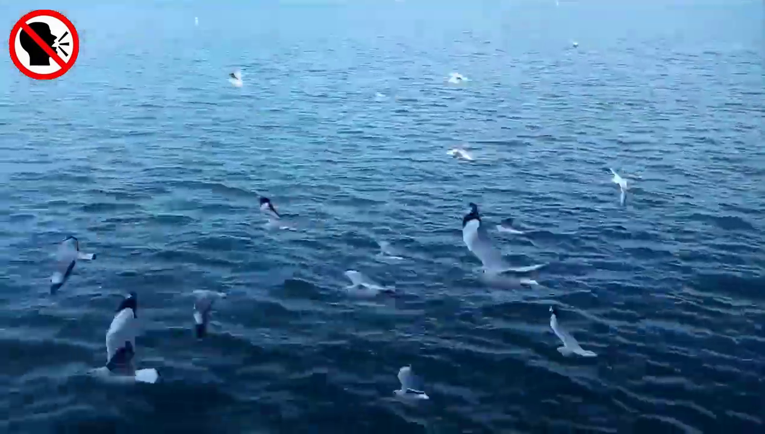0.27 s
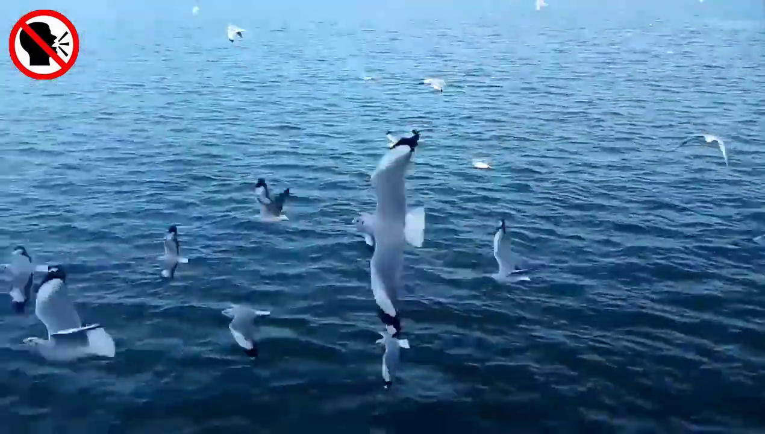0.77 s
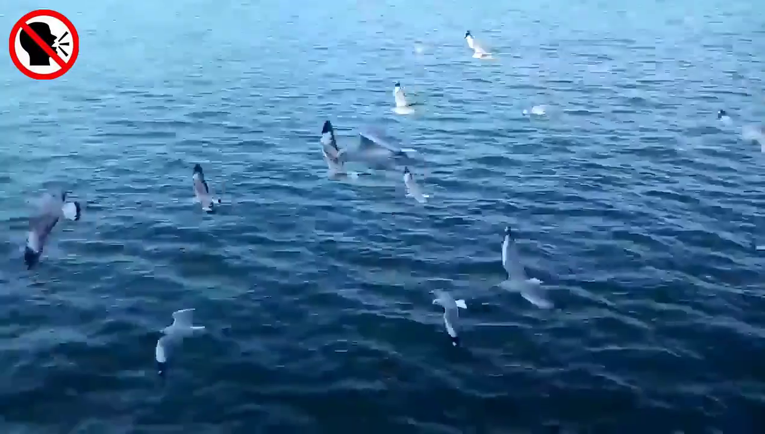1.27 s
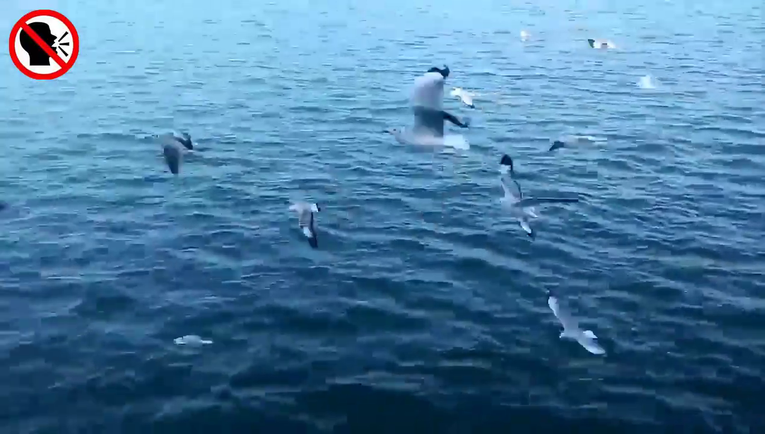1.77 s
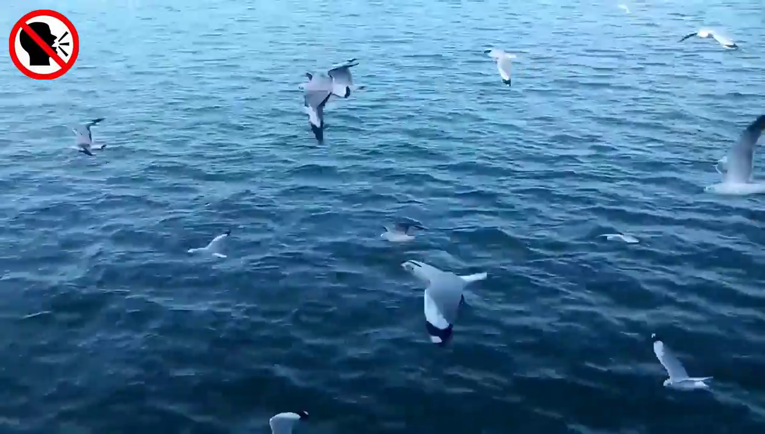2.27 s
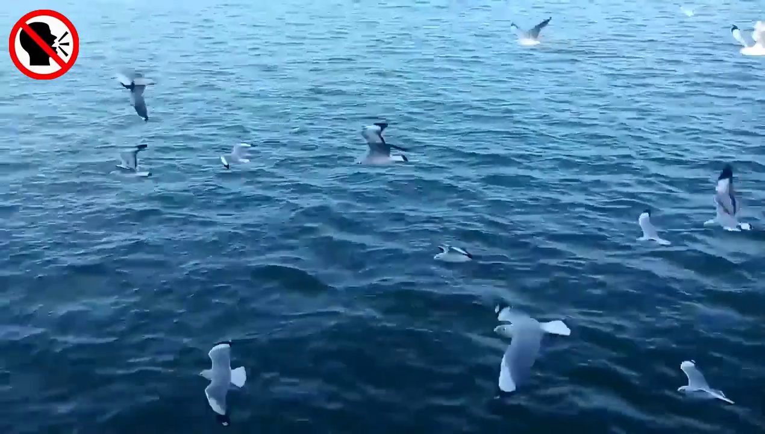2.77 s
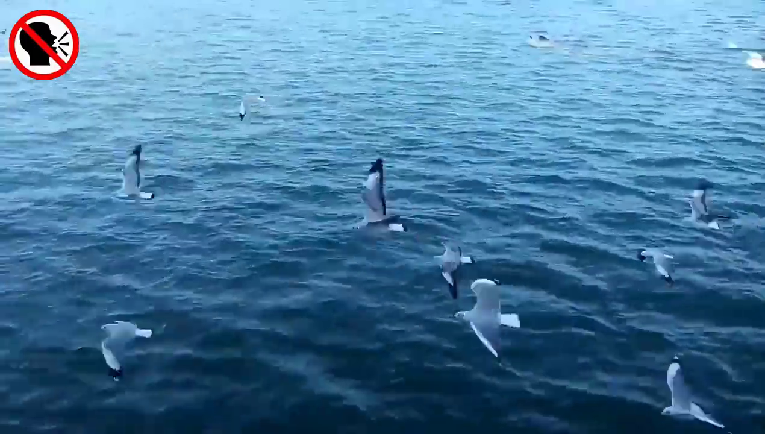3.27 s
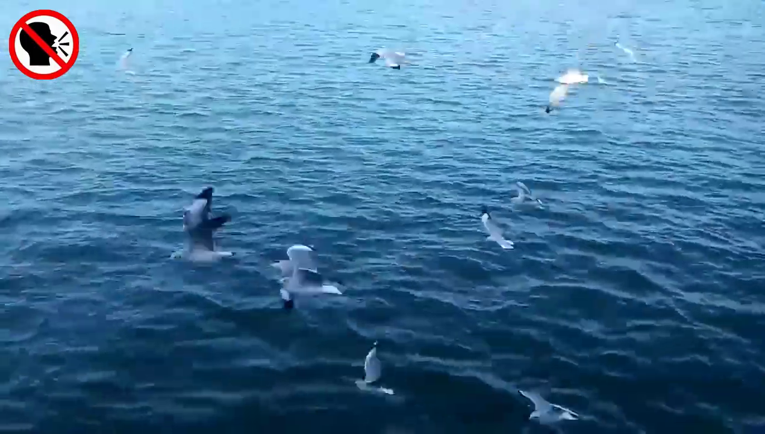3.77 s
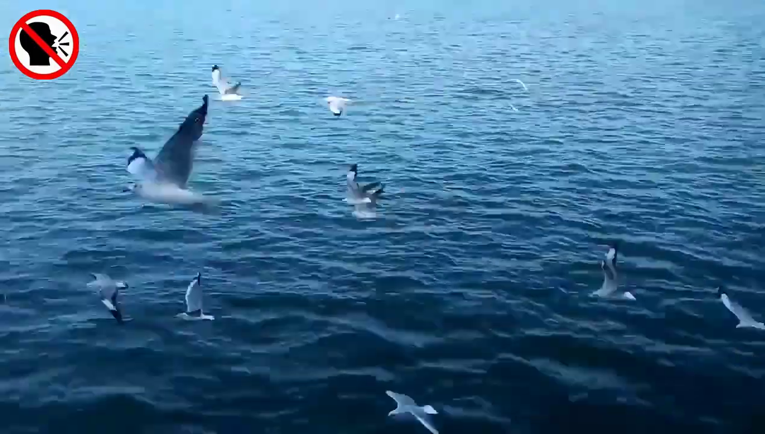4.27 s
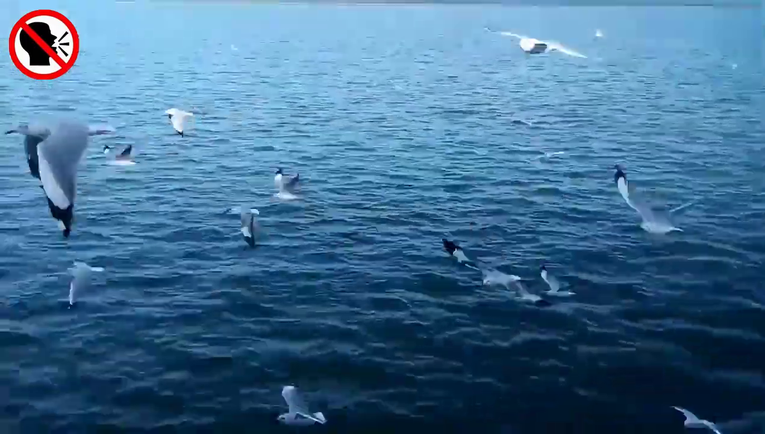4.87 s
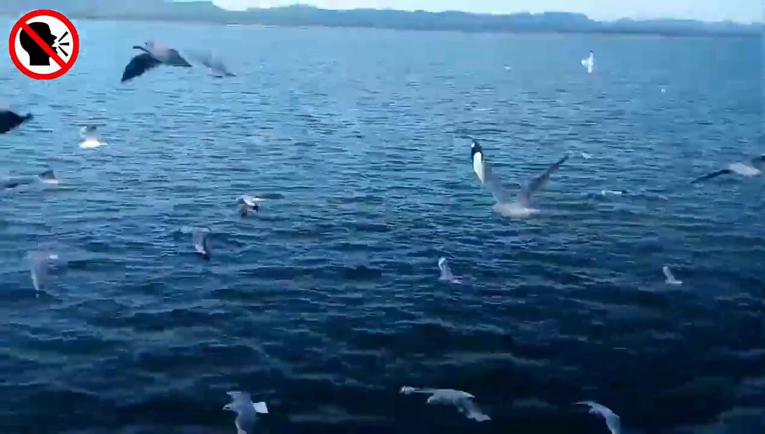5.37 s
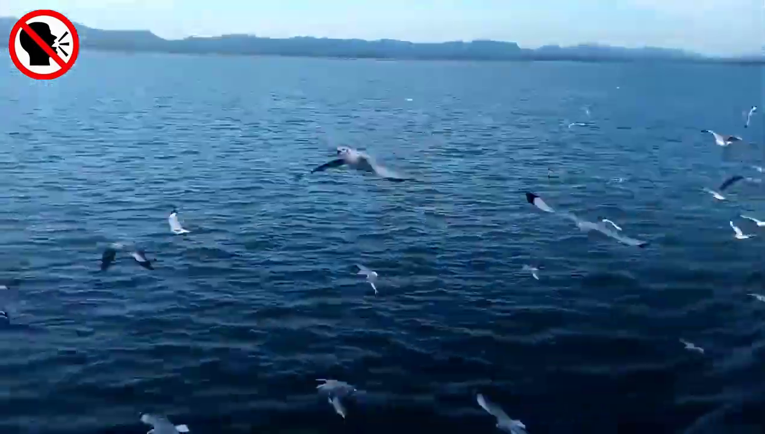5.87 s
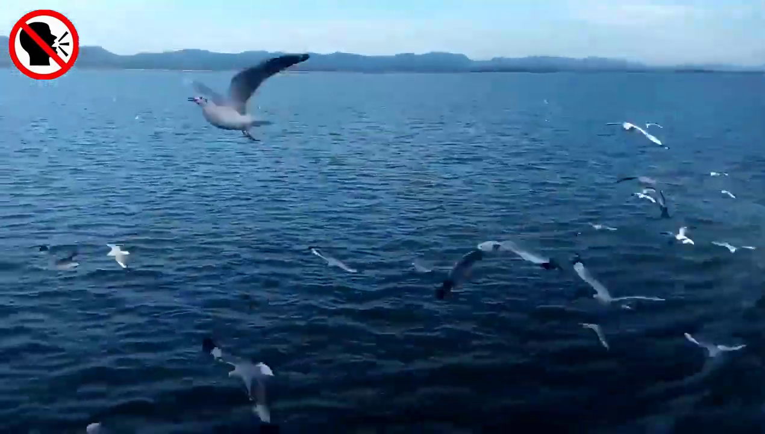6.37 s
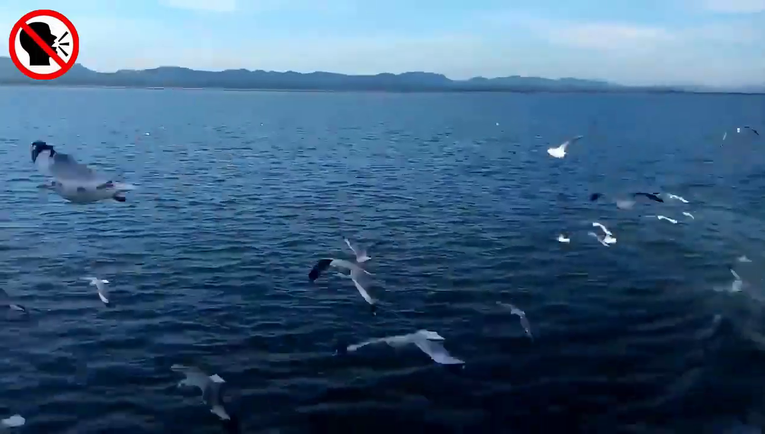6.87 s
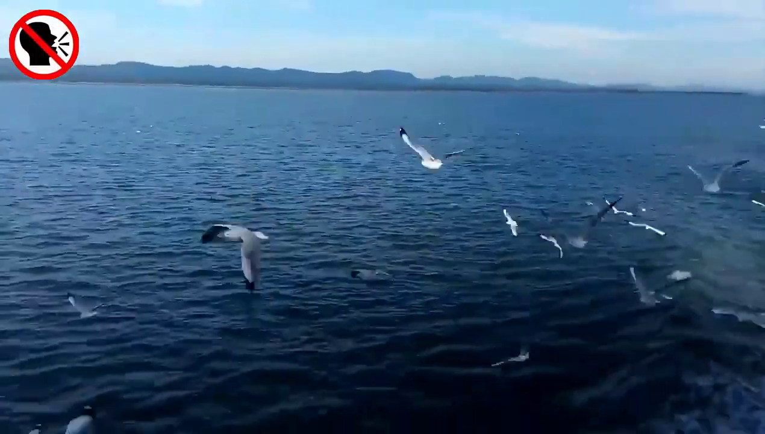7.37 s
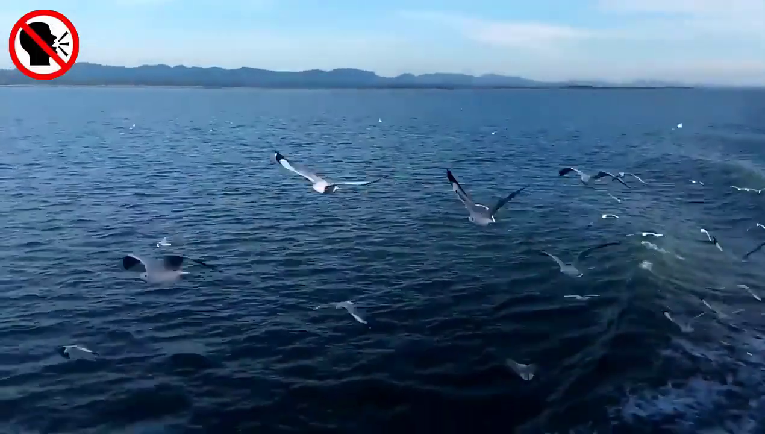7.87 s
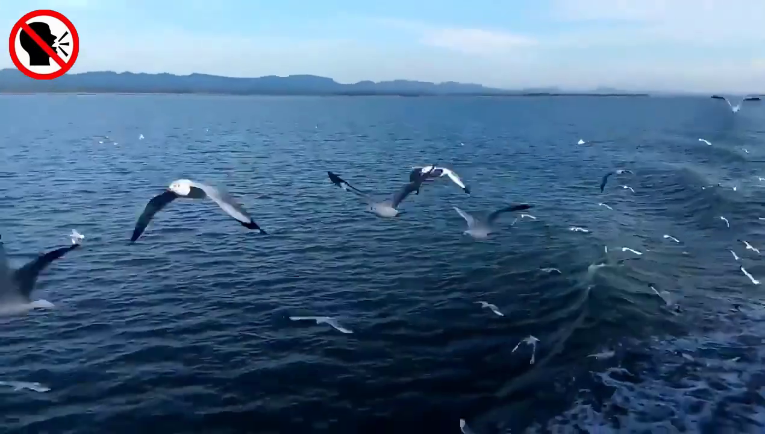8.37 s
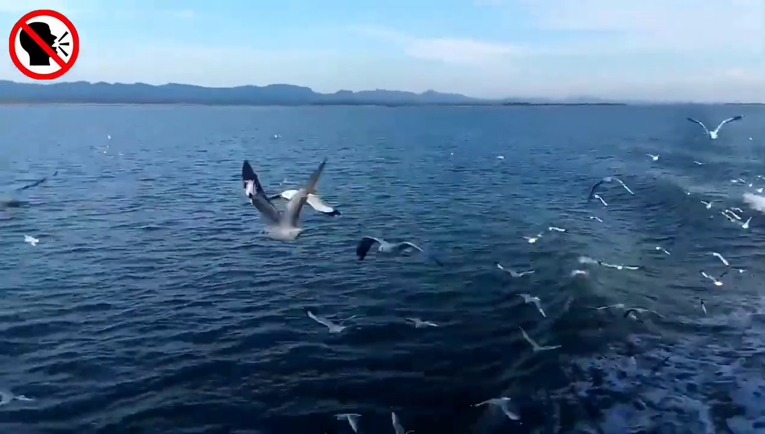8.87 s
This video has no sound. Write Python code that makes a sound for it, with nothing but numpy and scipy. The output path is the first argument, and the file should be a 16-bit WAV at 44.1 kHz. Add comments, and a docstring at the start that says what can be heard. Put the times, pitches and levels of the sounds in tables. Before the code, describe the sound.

A flock of gulls follows a boat on open water. Piercing, rough-edged screams come in two loud clusters, early and late; between them are low nasal yaps, thin high whistles from young birds and a few hoarse rasps, with faint distant yapping. Constant bubbling wash runs beneath. Most calls lean to the right, some central or left; a close stereo pair slightly overloads.

```python
"""Behind a boat at sea, a flock of gulls screams, wails and yaps over the rush of the bow wave.
The voices are stacks of overtones, made rough by shaken pitch and hiss; thin whistles, mostly from
young birds, and hoarse rasps join in. The water is shaped noise with ringing bubbles. Hull, deck and
waves throw the calls back, and the nearest birds overload the two close-set microphones."""
import sys
import numpy as np
from scipy import signal
from scipy.fft import rfft, irfft
from scipy.io import wavfile
from scipy.ndimage import uniform_filter1d

SR = 44100
rng = np.random.default_rng(int(sys.argv[2]) if len(sys.argv) > 2 else 0)


def transcribe(signal):
    """Save signal, clipped to [-1, 1], as a 16-bit WAV file at the path in sys.argv[1]."""
    frames = np.atleast_2d(signal).T
    limited = np.clip(frames, -1, 1)
    pcm = np.round(limited * 32767).astype(np.int16)
    wavfile.write(sys.argv[1], SR, pcm)


N = 402191  # length in samples


def amp(db):
    """Turns decibels into a gain."""
    return 10 ** (np.asarray(db) / 20)


def evened(x):
    """Scales to an average strength (rms) of one."""
    return x / np.sqrt(np.mean(x ** 2) + 1e-20)


def read(points, hz):
    """Reads a table between its points, on a log-frequency axis."""
    f, value = np.transpose(points)
    return np.interp(np.log(hz + 1), np.log(f + 1), value)


def coloured(x, points):
    """Filters a sound by a table of gains over frequency."""
    gain = amp(read(points, np.fft.rfftfreq(x.shape[-1], 1 / SR)))
    return irfft(rfft(x) * gain, x.shape[-1])


def wander(count, hz):
    """Smooth random motion of unit size, with little movement faster than hz times a second."""
    f = np.fft.rfftfreq(SR, 1 / SR)
    slow = rfft(rng.standard_normal(SR)) / (1 + (f / hz) ** 4)
    return evened(irfft(slow, SR))[:count]


def add(mix, s, sound, side_db, lag_ms):
    """Places a sound on the microphone pair by a level difference and a lag of the left microphone."""
    gains = evened(amp(np.array([side_db, -side_db]) / 2))
    for channel, gain, delay in zip(mix, gains, (lag_ms / 1000, 0)):
        first = max(round(s * SR) + round(delay * SR), 0)
        part = channel[first:][:len(sound)]
        part += gain * sound[:len(part)]


def screams(bright_db=2.5, scoop=.09, droop_oct_per_s=3.8):
    """Cries and screams with strong overtones, mostly from near birds, one a faint wail."""
    # Each row is a syllable: time of full voice in seconds, attack, hold and release in seconds,
    # pitch in Hz, sag in Hz per second, level in dB, roughness 0-1, half-lines between the harmonics
    # in dB, left-right difference in dB, lag of the left microphone in ms.
    syllables = [(1.169, .026, .122, 0.037, 3192, 860, 1.5, 0.08, -27, -7, 0.12),
                 (1.352, 0.043, 0.011, 0.02, 2832, 6130, -4, 0.89, -3, -11.5, 0.23),
                 (1.371, .008, 0.0087, 0.024, 2596, 7950, -10.5, 0.08, -20, -4, .13),
                 (1.959, 0.043, 0.017, 0.031, 2750, 3660, 0, 0.23, -4, 2.5, .01),
                 (2.008, 0.019, 0.1, 0.017, 2764, 100, -14, 0.52, 2, -2, .01),
                 (2.079, .035, 0.019, 0.047, 2868, 2530, -5, 0, -3.5, 5, .01),
                 (2.129, .02, 0.014, 0.089, 2790, 6950, -15, 0.27, 1, 0, .01),
                 (4.898, .04, .008, 0.032, 2610, 3100, -10, .3, 2.5, -10.5, .13),
                 (5.03, 0.054, 0.011, 0.067, 2716, 200, -14, 0.18, 5, -14, 0.11),
                 (6.47, .035, 0.059, 0.044, 2314, 690, -22, 0.08, 23, -14, .22),
                 (7.026, .04, 0.0128, 0.052, 2370, 2480, -14.5, 0.88, 1, -9, 0.26),
                 (8.412, 0.09, .07, 0.08, 3776, 297, -4, 0.57, -5.5, -13.5, 0.23),
                 (8.475, 0.042, 0.023, 0.058, 2674, 7510, -1, 0.46, -1, -2, 0.12),
                 (8.605, 0.038, 0.022, 0.016, 2736, 9130, 0.5, 0.38, -3.5, -6.5, .13),
                 (8.646, 0.016, 0.015, 0.082, 3070, 10000, -20.5, 0.47, -12, -1.3, 0.094)]
    out = np.zeros((2, N))
    for s, attack, hold, release, hz, sag, db, rough, half_db, side_db, lag_ms in syllables:
        voice = cry(attack, hold, release, hz, sag, db, rough, half_db, bright_db,
                    scoop, droop_oct_per_s)
        add(out, s - attack, voice, side_db, lag_ms)
    return out


def wails(hiss_db=-12, attack=.065, release=.23, scoop=.31, droop_oct_per_s=3.5):
    """Lower, duller cries that swell and die away slowly; the rougher the voice, the more it hisses."""
    # Each row: time of full voice in seconds, hold in seconds, pitch in Hz, sag in Hz per second,
    # level in dB, roughness 0-1, half-lines in dB, overtone strength in dB, left-right difference in dB,
    # lag of the left microphone in ms.
    wail_rows = [(.95, 0.2, 2378, 653, -18.5, 0.11, 12.5, -30, -7, .18),
                 (4.292, 0.088, 1944, 1870, -21.5, 0.34, -10, -17.5, 0, 0.049),
                 (8.9, .14, 2035, 1735, -13.5, 0.48, -3, -19, 6, -0.038)]
    # Air rasping in the bill. Each row: frequency in Hz, relative level in dB.
    bill_hiss = [(3000, -45), (5000, -18), (5800, -6), (6400, -7), (7200, -47)]
    out = np.zeros((2, N))
    for s, hold, hz, sag, db, rough, half_db, bright_db, side_db, lag_ms in wail_rows:
        voice = cry(attack, hold, release, hz, sag, db, rough, half_db, bright_db,
                    scoop, droop_oct_per_s)
        hiss = evened(coloured(rng.standard_normal(SR), bill_hiss))[:len(voice)]
        loudness = uniform_filter1d(abs(voice), size=200)
        add(out, s - attack, voice + hiss * amp(hiss_db) * rough * loudness, side_db, lag_ms)
    return out


def cry(attack, hold, release, hz, sag, db, rough, half_db, bright_db, scoop, droop_oct_per_s,
        fade_db=25, slack_rough=.3, waver=.0065, waver_hz=28):
    """Effort rises, holds and lets go: pitch scoops up, sags, wavers, then droops; slack is soft and rough."""
    t = np.arange(-attack, hold + release, 1 / SR)  # zero at full voice
    early = np.maximum(-t, 0) / attack
    late = np.maximum(t - hold, 0)
    slack = early + late / release
    # scoop and waver are shares of the pitch
    bend = 1 - scoop * early ** 2 + waver * wander(len(t), waver_hz)
    pitch = (hz - sag * t) * bend * 2 ** (-droop_oct_per_s * late)
    voice = syrinx(pitch, rough + slack_rough * slack, half_db, bright_db)
    return voice * amp(db - fade_db * slack ** 1.05) * signal.windows.tukey(len(t), .05)


def syrinx(hz, rough, half_db, bright_db, hiss_db=-3, jitter_hz=115, smear=0.72, quarter_lines=.33):
    """A bird's voice organ: harmonics and period-doubled half-lines; roughness shakes pitch and adds hiss."""
    # What throat and open bill let through. Each row: frequency in Hz, relative level in dB.
    throat = [(300, -54), (800, -24.5), (1400, -5), (1900, -8.5), (2600, -3), (3400, 1), (4200, -2),
              (5000, -10), (5800, -8), (7400, -33), (10000, -24.5), (15000, -35)]
    count, rough = len(hz), np.clip(rough, 0, 1)
    shake = jitter_hz * rough * (wander(count, 445) + 0.638 * wander(count, 102.6))
    turns = np.cumsum(hz + shake) / SR
    # uneven cycles spread the main line into a noisy band
    tone = np.cos(2 * np.pi * turns) + smear * rough * wander(count, 450) * np.sin(2 * np.pi * turns)
    for k in (1, 3, 4, 5, 6, 7, 8):  # multiples of half the pitch; odd ones are half-lines
        db = read(throat, hz * k / 2) + half_db * (k % 2) + bright_db * (k > 2)
        tone = tone + amp(db) * (hz * k < SR) * np.cos(np.pi * k * turns)
    # the period doubles once more
    quarter = quarter_lines * amp(np.minimum(half_db, 0))
    tone = tone * (1 + quarter * np.cos(np.pi * turns / 2))
    hiss = evened(coloured(rng.standard_normal(SR), throat))[:count]
    hiss = hiss * (1 + .5 * np.cos(np.pi * turns))  # puffs at half the pitch
    voice = (tone + amp(hiss_db + bright_db) * rough * hiss) * rattle(count, rough)
    # even out the loudness over about 20 ms
    return voice / np.sqrt(uniform_filter1d(voice ** 2, size=900) + 1e-9)


def rattle(count, rough, rate_hz=105, depth=0.46, uneven=0.34):
    """A strained syrinx beats irregularly, chopping the voice."""
    rate = rate_hz * (1 + uneven * wander(count, 76))
    beat = np.sin(2 * np.pi * np.cumsum(rate) / SR)
    return np.exp(rough * depth * (beat + .5 * wander(count, 220)))


def yaps(arch=0.3, half_db=2, edge_db=21, level_db=-1, top_hz=5000, end_rough=.6, rough_per_db=.05):
    """Short yaps on one arch of pitch, rougher when soft and at their ends; the half-shut bill dulls them."""
    # Each row: middle in seconds, nominal length in seconds, top pitch in Hz, relative level in dB,
    # overtone strength in dB, left-right difference in dB, lag of the left microphone in ms.
    yap_rows = [(1.419, 0.052, 1844, -16, -9, -10, 0.27), (1.529, 0.07, 1748, -6, -14.5, 2, 0.025),
                (1.76, 0.11, 1802, -19.5, -6.5, -8, 0.15), (2.198, 0.043, 1933, -11, -12, 2, 0),
                (2.304, 0.11, 1773, -18, -3, -10.5, 0.22), (2.524, 0.099, 1730, -16.5, -9, -14, 0.27),
                (2.633, 0.064, 1747, -9.5, -16, 1, 0.058), (2.806, 0.065, 1690, -16, -14.5, -8, .28),
                (3.07, 0.04, 1612, -14, -29, -11, .16), (3.109, 0.068, 1630, -14.5, -20.5, -13, 0.22),
                (3.169, 0.064, 1535, -11.5, -14, 0, .09), (3.194, 0.055, 1688, -9.5, -16.5, -1, 0.057),
                (3.735, 0.063, 1729, -10.5, -12, -2, 0.14), (4.022, 0.044, 1690, -15.5, -14, 2, 0.11),
                (4.308, 0.06, 1733, -11.5, -14, -4.5, 0.17), (5.517, 0.052, 1648, -16, -14, -8, 0.19),
                (6.212, 0.053, 1763, -10, -16, -9, 0.21), (6.935, 0.069, 1746, -11.5, -12, -9, 0.2),
                (7.061, 0.1, 1600, -12.5, -17, -9, 0.24), (7.288, 0.079, 1747, -9.5, -14.5, -10, 0.21),
                (7.662, 0.12, 1688, -14.5, -11.5, -10, 0.4), (8.163, 0.07, 1733, -11.5, -18, -11.5, 0.26)]
    out = np.zeros((2, N))
    for s, length, hz, db, bright_db, side_db, lag_ms in yap_rows:
        u = np.linspace(-1, 1, int(length * SR * 1.2))  # room for the faint ends
        rough = end_rough * u ** 2 - rough_per_db * db
        voice = syrinx(hz * (1 - arch * u ** 2), rough, half_db, bright_db)
        swell = amp(db + level_db - edge_db * abs(u) ** 1.96) * signal.windows.tukey(len(u), .15)
        add(out, s - len(u) / SR / 2, voice * swell, side_db, lag_ms)
    return signal.lfilter(*signal.butter(1, top_hz, fs=SR), out)


def whistles(top=.42, sag=0.38, overtone_db=-38, side_db=-13.5, lag_ms=0.24):
    """Nearly pure whistled notes, mostly young birds', one a second strand within the long scream."""
    # Each note rises a little and droops at the end.
    # Each row: start in seconds, end in seconds, top pitch in Hz, level in dB.
    whistle_rows = [(0.326, 0.476, 3320, -23.5), (1.18, 1.29, 3504, -19.5), (2.314, 2.403, 3700, -27.5),
                    (3.108, 3.294, 3445, -18.5), (4.061, 4.27, 3596, -18), (4.449, 4.64, 3650, -18.5),
                    (4.503, 4.539, 4320, -20.5), (4.507, 4.653, 4820, -41), (4.62, 4.806, 3630, -17.5),
                    (5.362, 5.514, 3613, -23)]
    out = np.zeros((2, N))
    for start, end, hz, db in whistle_rows:
        u = np.linspace(0, 1, int((end - start) * SR))
        pitch = hz * (1 - sag * (u - top) ** 2 + 0.0015 * wander(len(u), 80))
        turns = np.cumsum(pitch) / SR
        tone = np.sin(2 * np.pi * turns) + amp(overtone_db) * np.sin(4 * np.pi * turns)
        swell = abs(np.sin(np.pi * u)) ** 1.37 * amp(db + 2.4 * wander(len(u), 37))
        add(out, start, np.sqrt(2) * tone * swell, side_db, lag_ms)
    return out


def rasps(tone_share=1.0, jitter=0.043, side_db=-14, lag_ms=0.22):
    """Young birds' hoarse calls: a shaken whistle mixed with rattling turbulence."""
    # Each row: start in seconds, end in seconds, pitch in Hz, level in dB.
    rasp_rows = [(5.534, 5.731, 4280, -26), (6.368, 6.466, 4230, -23.5), (7.437, 7.644, 4430, -21.5)]
    # Colour of the turbulence. Each row: frequency in Hz, relative level in dB.
    rasp_colour = [(1500, -41), (2800, -8), (3500, -1.5), (4500, -0.5), (5400, -15.5), (6500, -15.5),
                   (7800, -37), (10500, -18.5), (13000, -48)]
    out = np.zeros((2, N))
    for start, end, hz, db in rasp_rows:
        count = int((end - start) * SR)
        pitch = hz * (1 + jitter * wander(count, 490))
        tone = np.sin(2 * np.pi * np.cumsum(pitch) / SR)
        hiss = evened(coloured(rng.standard_normal(SR), rasp_colour))[:count]
        voice = evened((hiss + tone_share * tone) * rattle(count, rough=0.66))
        add(out, start, amp(db) * voice * signal.windows.tukey(count, .45), side_db, lag_ms)
    return out


def far_flock(count=16, level_db=-32, pitch_hz=1600):
    """Distant birds yap at random, dull and half buried in the wash."""
    out = np.zeros((2, N))
    for when, length, pitch, side in rng.uniform(-1, 1, (count, 4)):
        u = np.linspace(-1, 1, int(SR * .1 * 2 ** length))
        hz = pitch_hz * (1 + .2 * pitch) * (1 - .15 * u ** 2)
        voice = syrinx(hz, rough=.6, half_db=0, bright_db=-22)
        swell = np.cos(np.pi * u / 2) * amp(level_db)
        add(out, (when + 1) / 2 * N / SR, voice * swell, 6 * side, -.15 * side)
    return out


def echoes(x, t60=0.35, wet_db=-14):
    """Hull, deck and waves scatter a spray of reflections that would die by 60 dB in t60 seconds."""
    t = np.arange(SR // 3) / SR
    # about 1500 reflections a second, none in the first 2 ms
    taps = rng.standard_normal((2, len(t))) * (rng.random((2, len(t))) < 1500 / SR)
    taps = taps * (t > .002) * amp(-60 * t / t60)
    taps /= np.linalg.norm(taps, axis=1, keepdims=True)
    return amp(wet_db) * signal.oaconvolve(x, taps, axes=1)[:, :N]


def wash(patchy_db=2.02, flicker_db=0.34, level_db=-21):
    """Breaking water in the bow wave: broad noise with drifting patches and quick surges."""
    # Colour of the water. Each row: frequency in Hz, relative level in dB.
    wash_colour = [(15, -75), (25, -40), (178, -31), (221, -23.5), (330, -23.5), (739, -5), (1080, 1),
                   (2410, -17), (2760, -19.5), (3330, -22), (4600, -29), (5860, -34.5), (6350, -40.5),
                   (10600, -42.5), (15400, -63.5)]
    # Balance of the water. Each row: frequency in Hz, left-right difference in dB.
    wash_side = [(60, 3), (110, 7.5), (200, 8), (380, 2.5), (700, 4.5), (1290, 3.5), (2380, 4.5), (4390, 0),
                 (8110, -6), (15000, -9)]
    # How alike the two sides are. Each row: frequency in Hz, left-right likeness from -1 to 1.
    wash_same = [(60, 0.25), (600, 0.61), (1100, 0.43), (1600, -0.33), (3000, -0.25), (6000, 0.081)]
    frames, hz = N // 256 + 5, np.fft.rfftfreq(1024, 1 / SR)
    a, b, c, d, patches = rng.standard_normal((5, frames, len(hz)))
    patches = uniform_filter1d(patches, size=9, axis=0)  # smooth in time, then in frequency
    patches = evened(uniform_filter1d(patches, size=10, axis=1))
    flicker = evened(uniform_filter1d(rng.standard_normal((frames, 1)), size=4, axis=0))
    same = np.clip(read(wash_same, hz), -1, 1)
    side = amp(read(wash_side, hz) / 2)
    left = a + 1j * b
    right = same * left + np.sqrt(1 - same ** 2) * (c + 1j * d)
    z = np.array([left * side, right / side])
    z *= amp(read(wash_colour, hz) + patchy_db * patches + flicker_db * flicker)
    z /= np.sqrt(side ** 2 + side ** -2 + 2 * same)  # the colour holds for the sum of both sides
    water = signal.istft(z.swapaxes(1, 2), nperseg=1024, noverlap=768)[1][:, :N]
    return evened(water) * amp(level_db)


def bubble(hz, cycles=5, rise=0.074):
    """An air pocket rings briefly, rising in pitch."""
    age = np.arange(int(8 * cycles / hz * SR)) / SR * hz / cycles  # one = the fading time
    ring = np.sin(2 * np.pi * cycles * age * (1 + rise * age / 2))
    return ring * np.exp(-age) * (1 - np.exp(-4 * age))


def bubbles(per_s=8, level_db=-36, size_db=4, count=24):
    """Bubbles of many sizes in the bow wave, and a gulp of water slapping the hull."""
    # Each row: start in seconds, pitch in Hz, peak level in dB before the left-right balance.
    gulp_rows = [(.051, 716, -13)]
    out = np.zeros((2, N))
    for k, hz in enumerate(np.geomspace(600, 1900, count)):
        sizes = amp(size_db * np.minimum(rng.exponential(1, N), 4))
        births = (rng.random(N) < per_s / SR) * sizes  # per_s counts each pitch alone
        out[k % 2] += signal.oaconvolve(births, bubble(hz))[:N]
    out = amp(level_db) * evened(out + 0.1 * out[::-1])
    for s, hz, db in gulp_rows:
        add(out, s, amp(db) * bubble(hz) / bubble(hz).max(), 2, 0)
    return out


def scene():
    """Birds with their reflections, over the bow wave."""
    birds = screams() + wails() + yaps() + whistles() + rasps() + far_flock()
    return birds + echoes(birds) + wash() + bubbles()


def record(dry, edge_hz=15600):
    """Peaks beyond full scale are cut flat, as in overload; then the highest treble is filtered off."""
    fine = signal.resample_poly(dry, 2, 1, axis=1)  # cut at twice the sample rate
    clipped = signal.resample_poly(np.clip(fine, -1, 1), 1, 2, axis=1)
    lowpass = signal.firwin(511, edge_hz, window=("kaiser", 9), fs=SR)
    return signal.oaconvolve(clipped, lowpass[None], "same")


dry = scene()
out = record(dry)
transcribe(out)
```